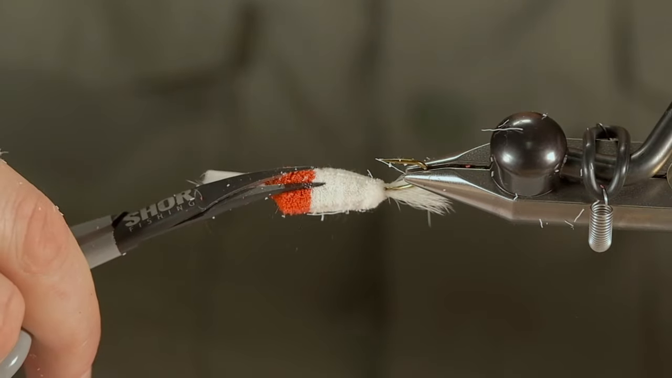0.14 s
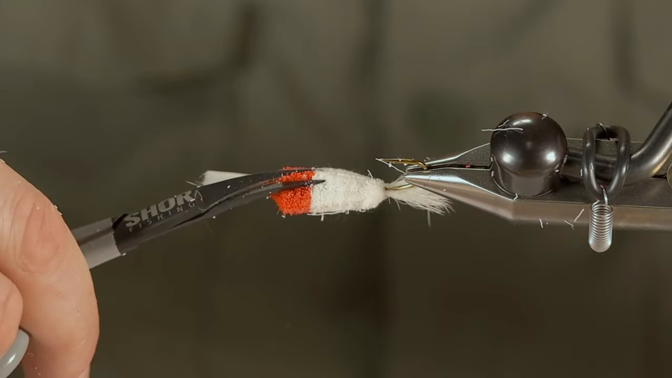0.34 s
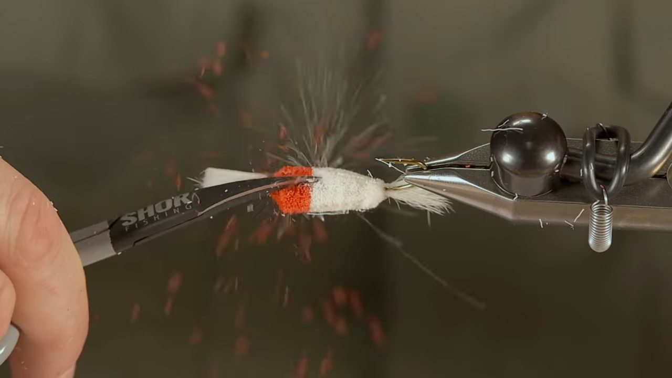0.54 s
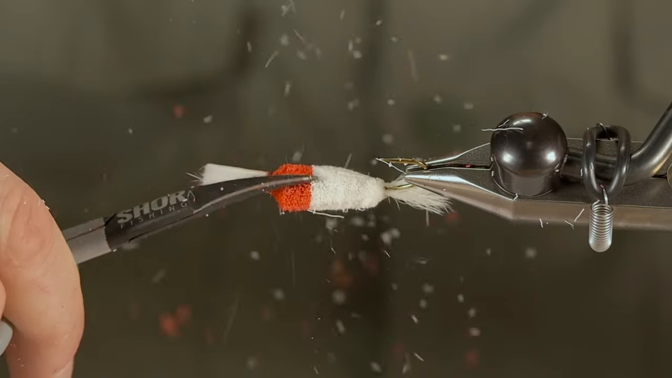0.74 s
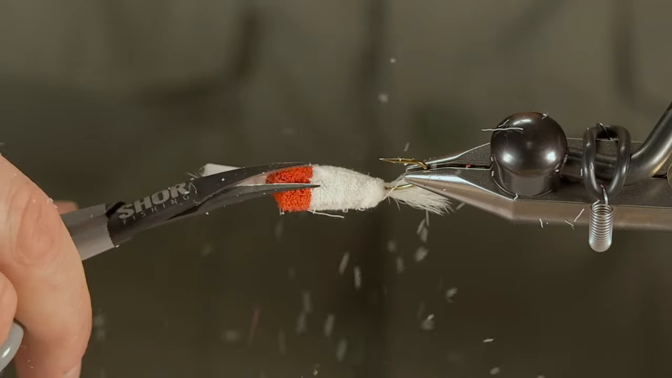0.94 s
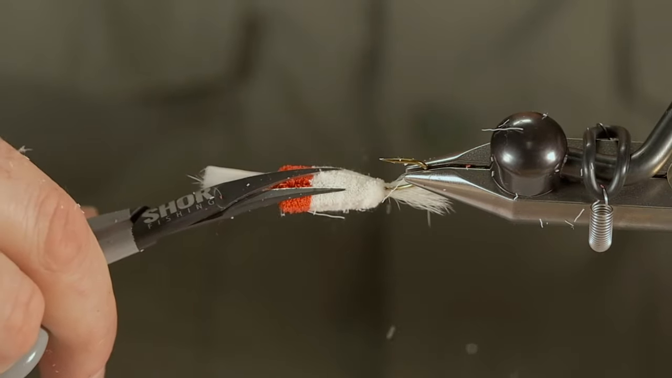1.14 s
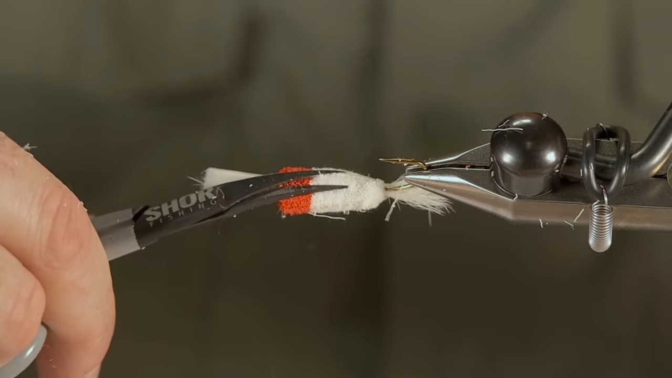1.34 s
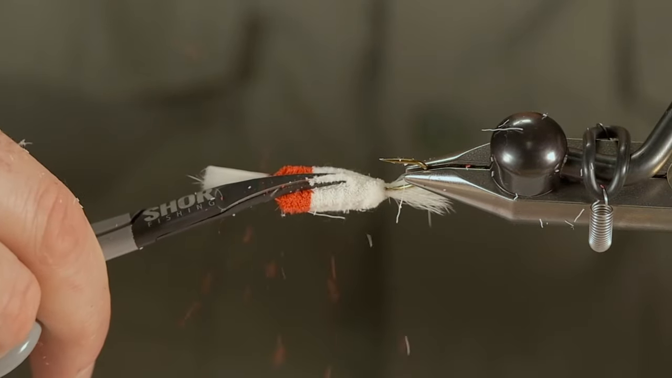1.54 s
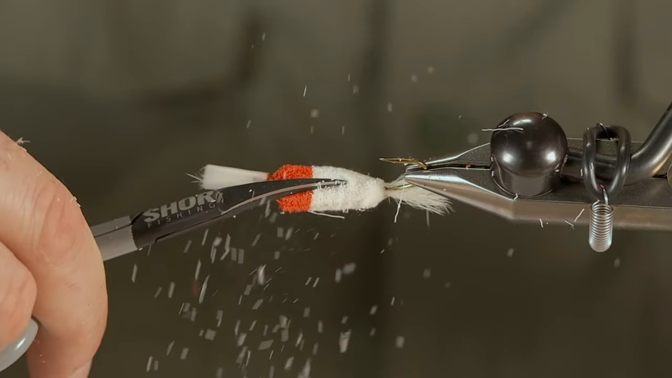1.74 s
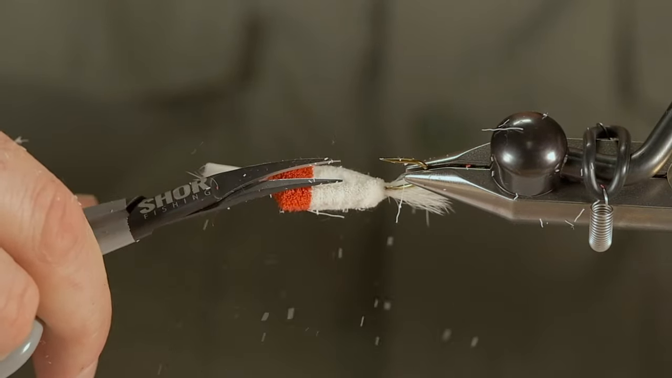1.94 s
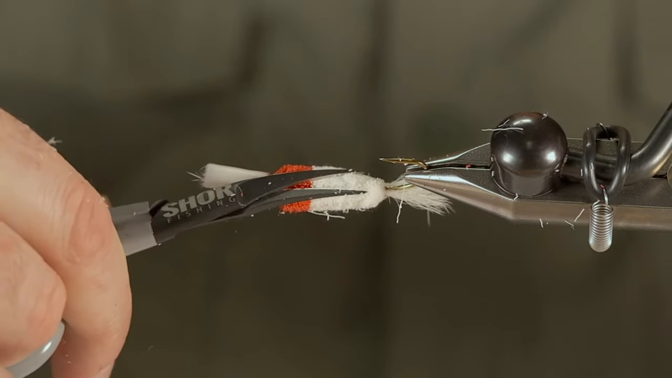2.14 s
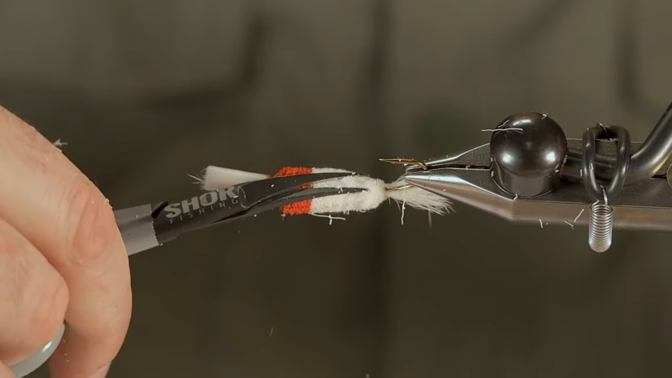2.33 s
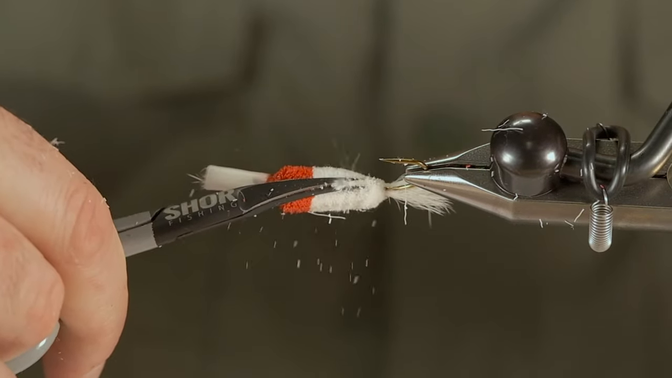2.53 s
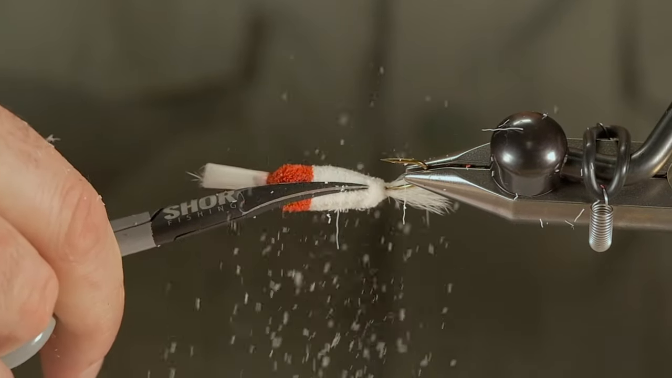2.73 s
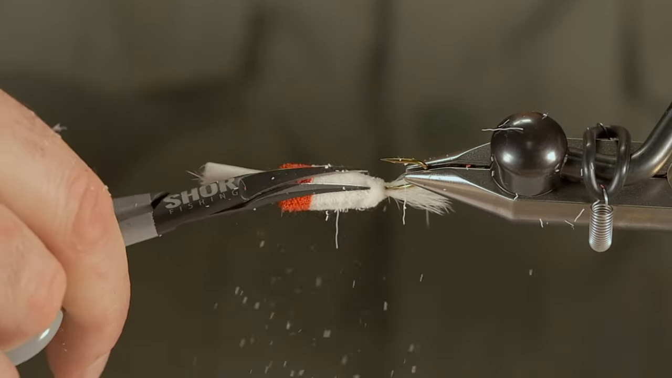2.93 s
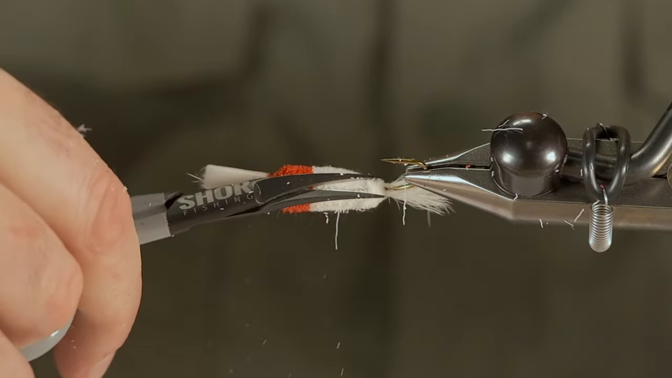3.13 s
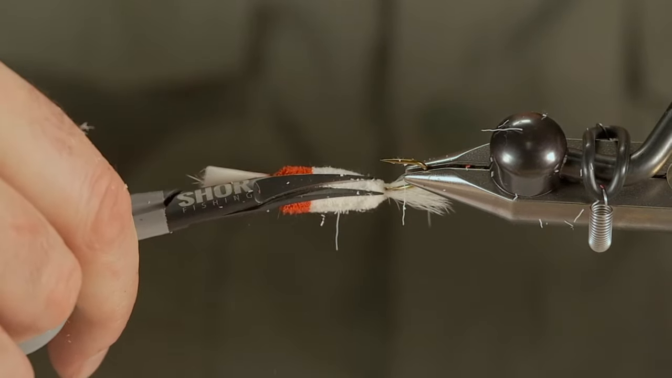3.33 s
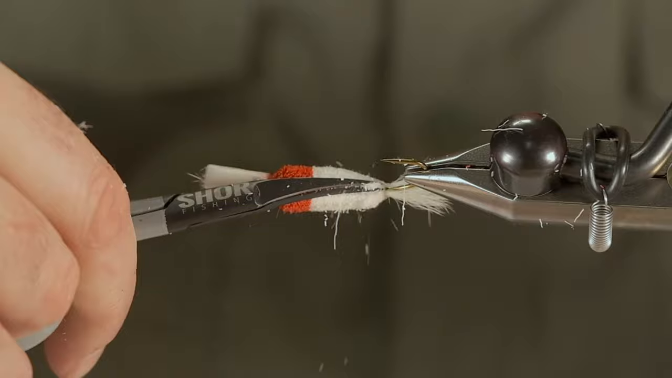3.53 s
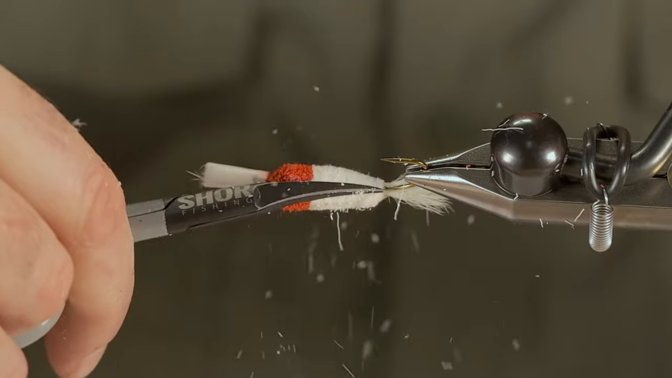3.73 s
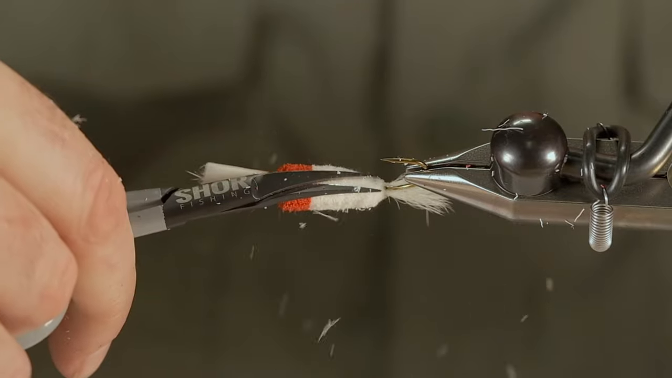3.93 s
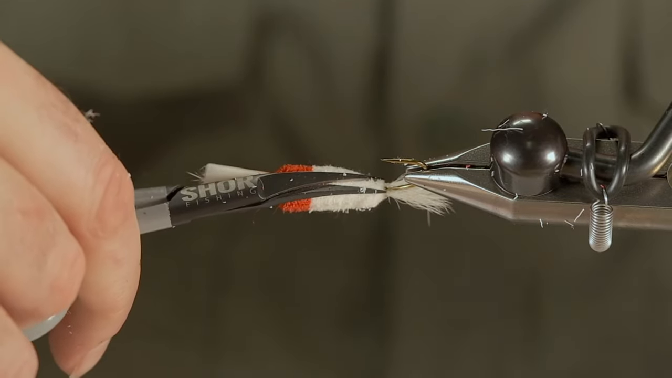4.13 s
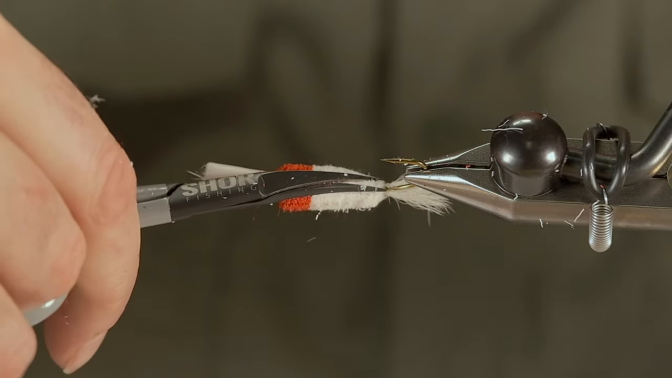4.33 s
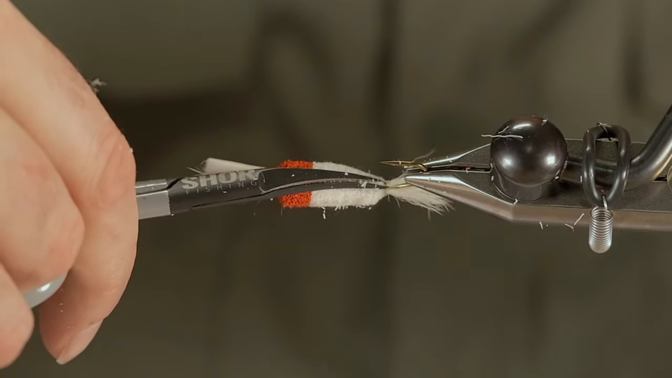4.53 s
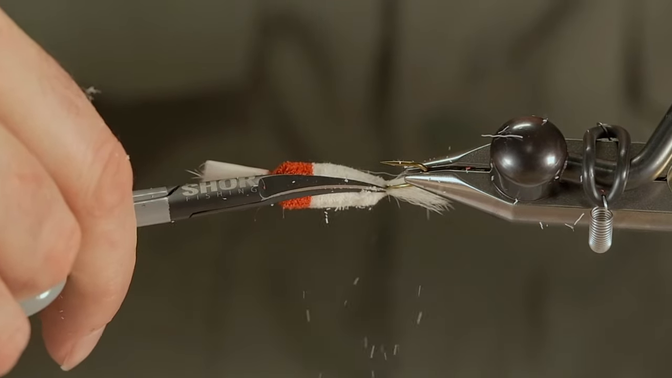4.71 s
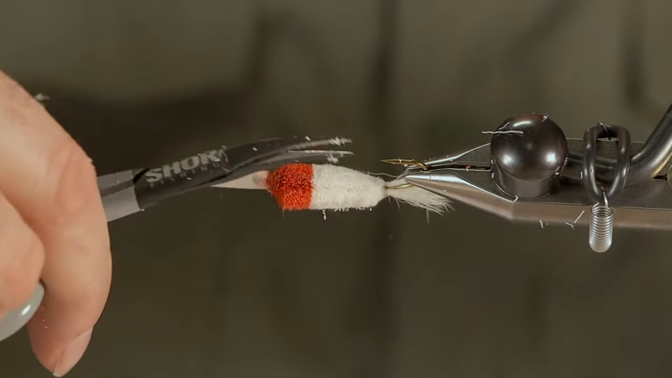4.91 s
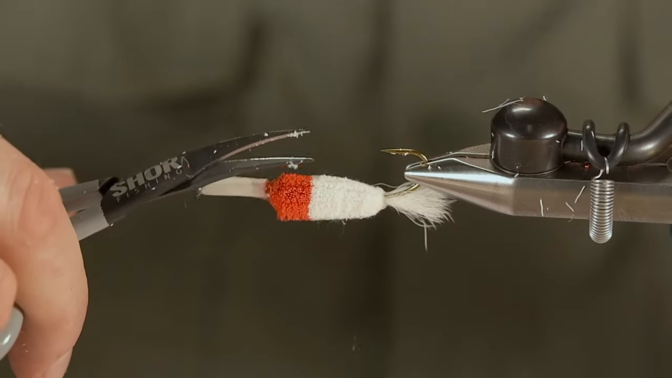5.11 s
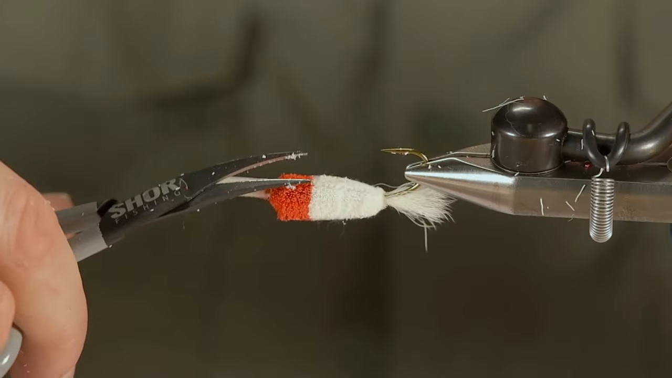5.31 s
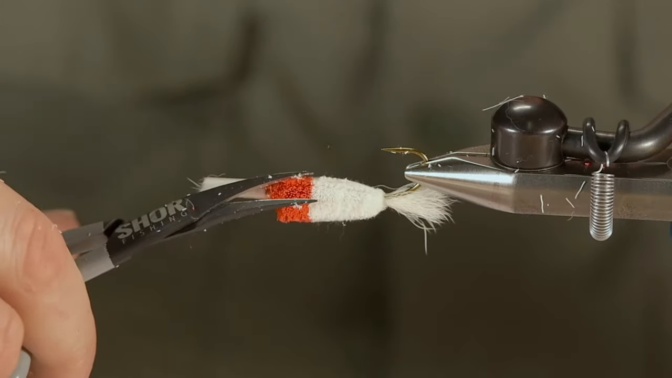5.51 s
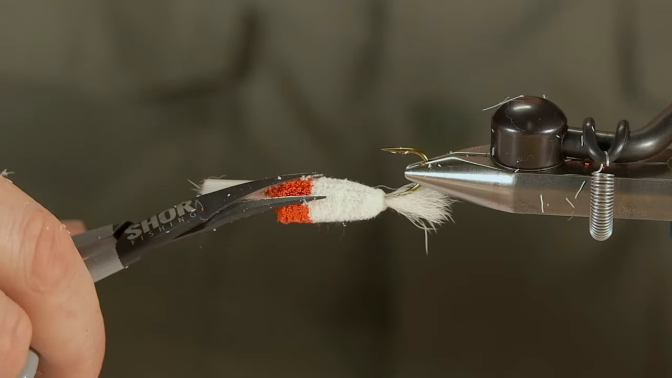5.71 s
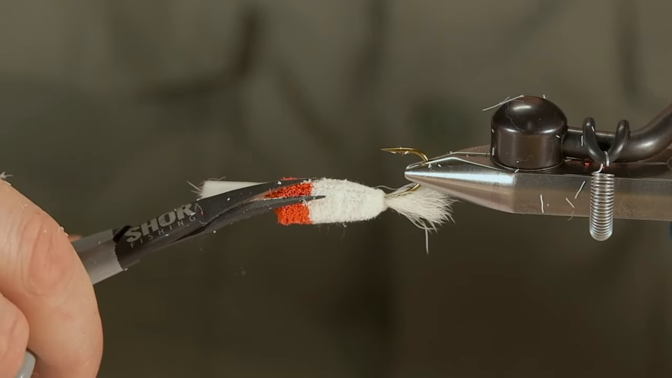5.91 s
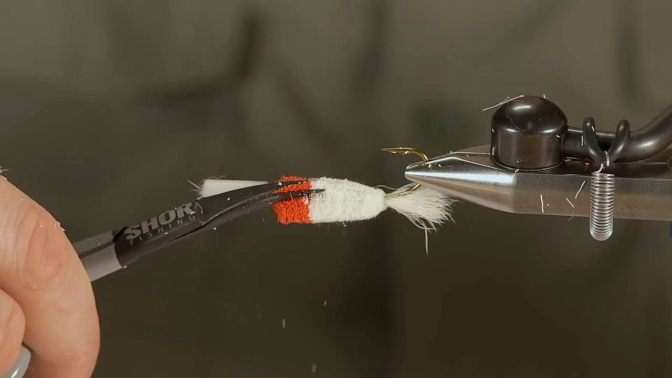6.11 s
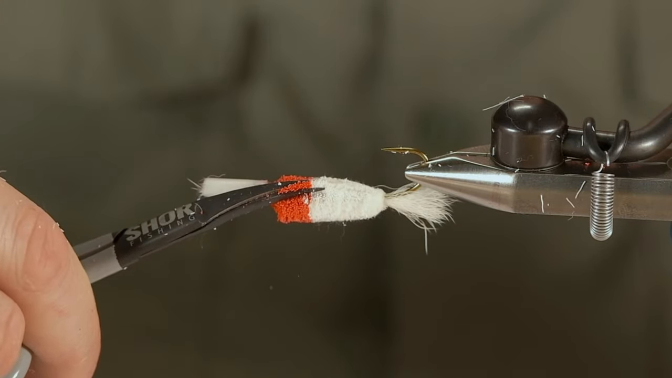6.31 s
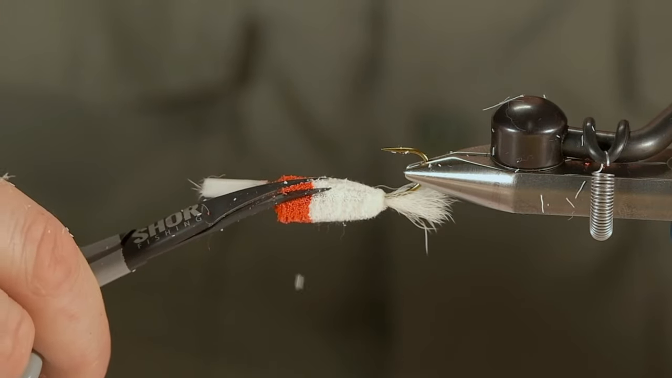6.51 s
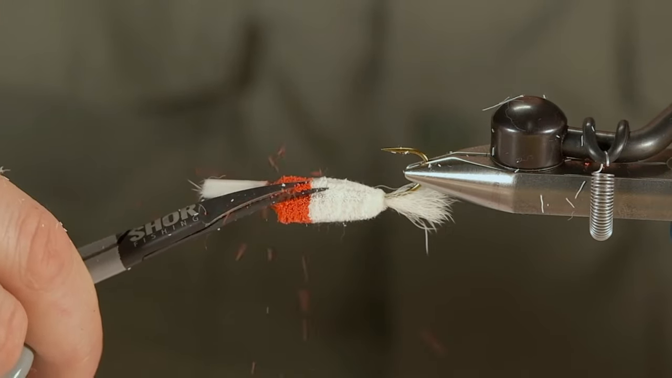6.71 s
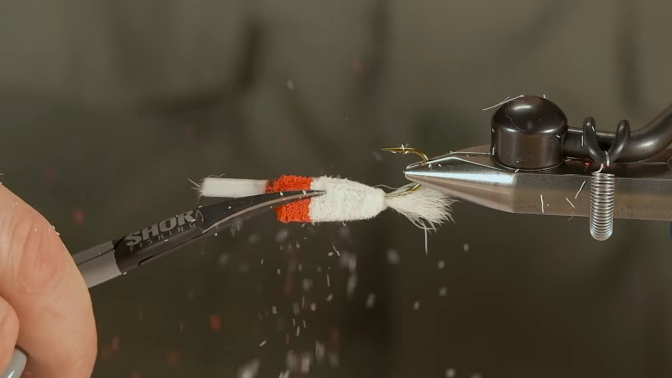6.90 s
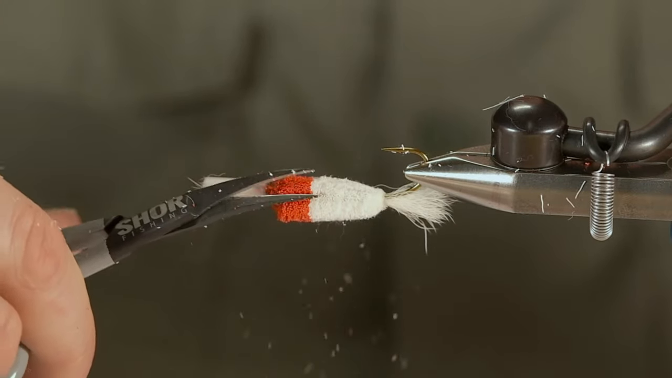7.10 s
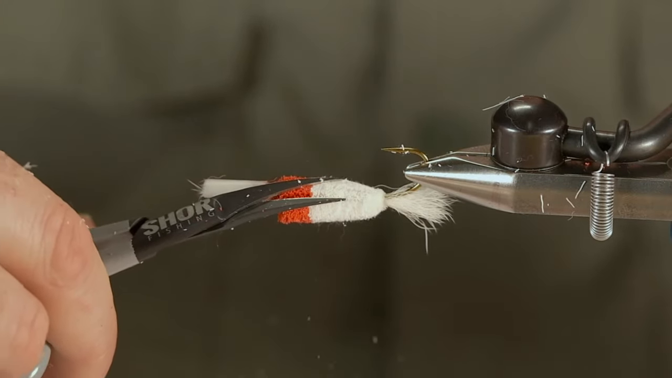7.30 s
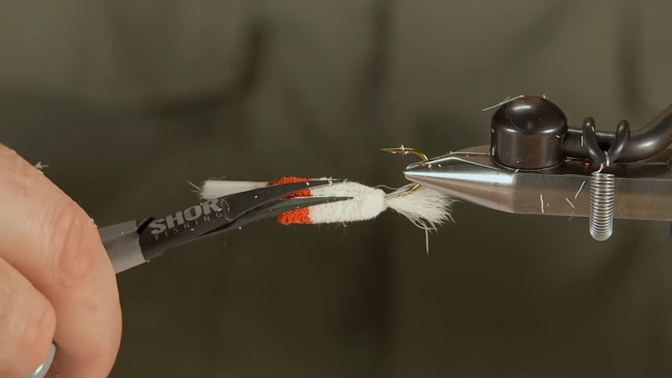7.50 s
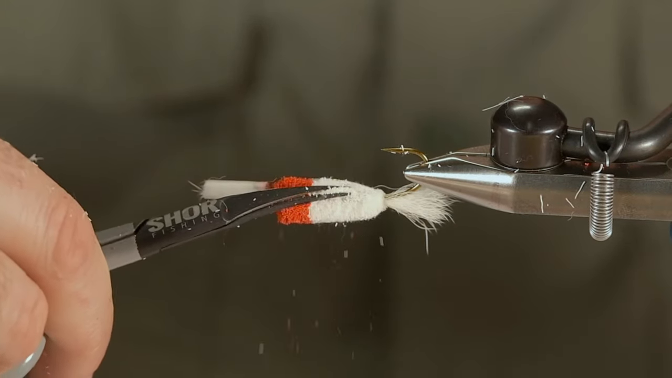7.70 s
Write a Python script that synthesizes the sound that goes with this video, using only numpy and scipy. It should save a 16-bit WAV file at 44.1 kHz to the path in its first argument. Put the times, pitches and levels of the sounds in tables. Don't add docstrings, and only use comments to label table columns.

```python
import sys
import numpy as np
from scipy import signal
from scipy.fft import rfft, irfft
from scipy.io import wavfile
from scipy.ndimage import uniform_filter1d

SR = 44100
rng = np.random.default_rng(int(sys.argv[2]) if len(sys.argv) > 2 else 0)


def unload_audio(sound):
    columns = np.transpose(np.atleast_2d(sound))
    steps = np.round(np.clip(columns, -1, 1) * 32767)
    wavfile.write(sys.argv[1], SR, steps.astype(np.int16))


def ratio_of_db(decibels):
    return 10 ** (np.asarray(decibels, float) / 20)


N = 341775

# (frequency [Hz], level [dB per Hz])
AIR_HISS = [(15, -65), (25, -31), (70, -9), (113, -8), (161, 0.5), (199, -7), (324, -7), (447, -16.5),
            (570, -16.5), (618, -8.5), (854, -17), (1970, -19), (2440, -19.5), (3120, -21.5),
            (15700, -30.5)]
# (frequency [Hz], level [dB])
HISS_TOP = [(15750, 0), (15950, -30)]
# (frequency [Hz], width [Hz], rms level [dB])
DUCTS = [(171, 21.5, -68.5), (310.4, 42, -72), (490, 38, -71), (640, 76, -75.5), (696.5, 21, -70.5),
         (776, 21.7, -93), (1179, 45, -73.5), (1359, 15, -75), (2126, 47, -74), (2428, 45, -70.5),
         (2650, 63, -73.5), (4190, 77, -79)]
# (frequency [Hz], rms level [dB])
FAN_TONES = [(628, -64.5), (790, -76), (2445, -74.5)]

# (time [s], length [s], desk shake [dB], bearing rub [dB])
TWISTS = [
    (5.034, .16, -53.5, -52),
    (5.21, 0.091, -60, -63),
    (5.334, 0.21, -55.5, -62),
    (5.512, 0.086, -64, -69),
]
# (time [s], length [s], level [dB])
SLEEVE = [
    (4.91, .04, -60),
    (5.04, 0.11, -58.5),
    (5.26, 0.16, -65),
    (5.76, 0.29, -62),
]
GRIP_S, LET_GO_S, RUB_T60_S = 0.04, 0.31, 0.82
# (frequency [Hz], width [Hz], level [dB])
RUMBLE = [(50, 25, -14), (98, 28, 3), (133, 23, -4), (216, 22, 7), (331, 30, 0.5)]
# (time [s], peak [dB], centre [Hz], t60 [s])
TICKS = [(.833, -51, 6400, 0.011), (2.8544, -53, 5000, .008), (5.0589, -53, 3700, .01),
         (5.084, -46, 5900, .006), (5.098, -42.5, 8500, .008), (5.154, -49, 4800, 0.055),
         (5.3414, -47, 4900, 0.0086), (5.345, -51, 9000, .006), (5.365, -39, 3850, 0.014),
         (5.3718, -40, 3500, .012), (5.372, -40, 4900, .012), (5.446, -49, 3600, .012),
         (5.576, -49, 7500, .006), (5.817, -53, 5500, 0.0054), (5.8356, -49, 4000, .008),
         (5.8743, -47, 7450, .008), (5.9414, -53, 9060, 0.0053), (5.97, -49, 7160, .01),
         (7.504, -49.5, 3300, .015)]
# (time [s], peak [dB], frequency [Hz], t60 [s])
VISE_RINGS = [(5.05, -53, 745, .2), (5.093, -56, 3500, .14), (5.157, -57, 3490, .15),
              (5.155, -55, 1150, .07), (5.21, -53, 750, .25), (5.205, -70, 5560, .5),
              (5.295, -68, 5680, .3), (5.365, -44, 1270, .035), (5.3713, -45, 1270, .035),
              (5.367, -48, 420, .04), (5.371, -52, 850, .03), (5.371, -49, 2200, .015),
              (5.446, -53, 1290, .025), (5.372, -48, 3450, .025), (5.515, -59, 2700, .06),
              (5.527, -54, 1150, .09), (5.446, -55, 3400, .025)]

# (time [s], knock [dB], sway [dB], handles [dB])
BUMPS = [
    (0.606, -45, -49, -42.5),
    (1.659, -38, -43.5, -39),
    (2.607, -42, -42.5, -38),
    (3.618, -35, -38.5, -39.5),
    (4.452, -41, -55.5, -69),
    (4.629, -38.5, -40, -39),
    (5.218, -42, -47.5, -54),
    (5.415, -44, -53, -57),
    (5.527, -48, -54, -60),
    (6.822, -42, -45.5, -41),
]
# (frequency [Hz], level [dB], t60 [s])
DESK_KNOCK = [(216.5, 4.5, 0.11), (249.5, -6.5, 0.24), (301.5, -0.5, 0.12), (392, -15.5, 0.22)]
# (frequency [Hz], level [dB], t60 [s])
DESK_SWAY = [(51.5, -13, 1), (75.5, -5.5, 0.64), (84, -5.5, 0.51), (98.5, -0.5, 0.63), (106, -19, 0.56),
             (125.4, -11, 1)]

SHUT_TIMES = [.6062, 1.6589, 2.6055, 3.6172, 4.629, 6.8223]
# (length [s], cutting at its end [dB], last tuft [dB])
STROKES = [(0.099, -57, -44), (.09, -64, -50), (0.11, -62, -52), (0.065, -63, -63), (0.064, -72, -58),
           (0.097, -57.5, -46)]
CUT_DB_PER_S, TUFT_DB_PER_S, TUFT_LEAD_S = 122, 2400, 0.003
# (time [s], peak [dB])
STRANDS = [(.5094, -56), (.543, -53), (.558, -52), (.573, -46), (0.585, -49), (.5955, -47), (.601, -50),
           (2.5975, -50), (3.5654, -56), (3.585, -55), (3.6085, -50), (6.7445, -53), (6.7594, -54),
           (6.776, -50), (6.789, -47), (6.807, -50), (6.8145, -42), (1.6578, -36), (2.6035, -46),
           (3.6152, -42), (4.6262, -44), (4.6277, -38)]

# (shank [dB], blade [dB], tip [dB], edge [dB])
SNIP_COLOURS = [(-4.5, -6.5, -2.5, -2.5), (-3, -7.5, -4.5, -4), (-7.5, -3.5, -5.5, -6),
                (-7.5, -7.5, -3.5, -8), (-13, -12, -8, -9), (-6.5, -5, -6, -4.5)]
# (frequency [Hz], level [dB], t60 [s])
BLADE_MODES = [(1835, -8.5, 0.044), (2276, -0.5, 0.058), (2640, -16.5, 0.023), (3360, -15, 0.021),
               (3765, -5.5, 0.032), (4350, -6, 0.034), (4710, -6.5, 0.029), (5220, -9.5, 0.047),
               (5930, -8, 0.03), (6720, -8, 0.016), (7420, -5, 0.0233), (8030, -2.5, 0.024),
               (9420, -5, .022), (11180, -5, 0.013)]
# (frequency [Hz], level [dB per Hz])
LAST_CRACK = [(300, -44), (1450, -14), (2400, -3), (3000, -6), (7500, -3), (12200, -14.5), (15300, -15),
              (16400, -44)]
# (delay [s], level [dB])
WALLS = [(.0065, -13), (.0114, -14.5), (.0172, -29), (.0226, -44), (.031, -44)]
# (frequency [Hz], level [dB per Hz])
ECHOES = [(530, -62), (900, -34), (1070, -8.5), (1560, -8), (2300, -9), (3000, -11), (3600, -0.5),
          (4710, -5.5), (5320, -4), (7950, -3), (8980, -12), (11700, -3), (15000, -11), (15900, -20),
          (16500, -35)]
# (frequency [Hz], width [Hz], level [dB])
LINGER = [(2277, 120, 1), (3790, 120, -5), (4580, 190, -3.5), (6400, 200, -3.5), (7270, 160, 2),
          (8100, 180, 1), (9750, 200, -0.5), (11460, 260, -7)]
# (frequency [Hz], level [dB])
ROOM_TOP = [(15800, 0), (16100, -25)]
ROOM_T60_S, ROOM_DB, ROOM_FOLLOW = 0.14, -31.5, 0.45

# (frequency [Hz], left minus right [dB])
PORTS = [(700, 1.55), (1200, 1.1), (2500, 1.25), (5000, 1.35), (9000, 1.45), (13000, 1.3)]
# (frequency [Hz], level [dB])
TREBLE_END = [(16500, 0), (16800, -60)]


def fade(t, t60):
    return (t >= 0) * np.exp(-np.log(1000) * np.maximum(t, 0) / t60)


def unit(x):
    return x / np.sqrt(np.mean(x ** 2))


def noise(size=N):
    return rng.standard_normal(size)


def band(x, hz, width):
    return signal.lfilter(*signal.iirpeak(hz, hz / width, fs=SR), x)


def above(x, hz):
    return signal.sosfilt(signal.butter(3, hz, "high", fs=SR, output="sos"), x)


def colour(x, points):
    hz, db = np.transpose(points)
    grid = np.maximum(np.fft.rfftfreq(len(x), 1 / SR), 1)
    gain = ratio_of_db(np.interp(np.log(grid), np.log(hz), db))
    return irfft(rfft(x) * gain, len(x))


def walk(rate, size=N):
    span = int(SR / rate)
    return unit(uniform_filter1d(uniform_filter1d(noise(size), span), span))


def ring(modes, t, phases):
    return sum(ratio_of_db(db) * fade(t, t60) * np.sin(2 * np.pi * hz * t + phase)
               for (hz, db, t60), phase in zip(modes, phases))


def add(out, s, x):
    i = int(s * SR)
    out[i:i + len(x)] += x[:N - i]


def room():
    air = colour(unit(colour(noise(), AIR_HISS)) * ratio_of_db(-57.5), HISS_TOP)
    ducts = sum(ratio_of_db(db) * unit(band(noise(), hz, width)) for hz, width, db in DUCTS)
    turns = np.cumsum(1 + 0.002027 * walk(2.917)) / SR
    tones = sum(ratio_of_db(db + 3 + 1.8 * walk(6)) * np.sin(2 * np.pi * hz * turns) for hz, db in FAN_TONES)
    return air + ducts + tones


def moves(rows):
    t = np.arange(N) / SR
    return sum(ratio_of_db(db) * np.clip((t - s) / GRIP_S, 0, 1) * fade(np.maximum(t - s - hold, 0), LET_GO_S)
               for s, hold, db in rows)


def vise():
    shake = unit(sum(ratio_of_db(db) * unit(band(noise(), hz, width)) for hz, width, db in RUMBLE))
    out = shake * moves([(s, length, db) for s, length, db, _ in TWISTS])
    time = np.arange(N) / SR
    rub = sum(ratio_of_db(db) * moves([(s, 0, 0)]) ** .5 * fade(time - s, RUB_T60_S) for s, *_, db in TWISTS)
    out += unit(band(noise(), 706, 54)) * rub
    rustle = unit(band(noise() * ratio_of_db(2.9 * walk(200)), 3400, 5300))
    out += rustle * moves(SLEEVE) * ratio_of_db(-7.5)
    t = np.arange(SR // 8) / SR
    for s, db, hz, t60 in TICKS:
        burst = noise(len(t)) * fade(t, t60)
        tick = band(band(burst, hz, 0.51 * hz), hz, 0.58 * hz)
        add(out, s, tick * ratio_of_db(db) / np.abs(tick).max())
    for s, db, hz, t60 in VISE_RINGS:
        add(out, s, ring([(hz, db, t60)], t, [0]) * ratio_of_db(1.4 * walk(280, size=len(t))))
    return out


def thud(knock_db, sway_db, handle_db):
    t = np.arange(SR // 2) / SR
    handles = ring([(400, 1, .02), (520, 1, .015), (1050, 1, .012), (1250, 2, .012)], t, np.zeros(4))
    knock = ring(DESK_KNOCK, t, np.zeros(4)) * (1 - fade(t, 0.06))
    late = t - .018
    phases = [-2 * np.pi * hz * 0.0182 for hz, *_ in DESK_SWAY]
    sway = ring(DESK_SWAY, late, phases) * (1 - fade(late, 0.077))
    return above(ratio_of_db(knock_db) * knock + ratio_of_db(sway_db) * sway + ratio_of_db(handle_db) * handles, 46)


def closing():
    t, out = np.arange(N) / SR, 0
    for shut, (length, cut_db, tuft_db) in zip(SHUT_TIMES, STROKES):
        left = np.clip(shut - TUFT_LEAD_S - t, 0, 1)
        cutting = ratio_of_db(cut_db - CUT_DB_PER_S * left)
        pinch = ratio_of_db(tuft_db - TUFT_DB_PER_S * left)
        out = out + (t < shut) * (left < length) * (cutting + pinch)
    return out


def hairs():
    sizes = ratio_of_db(np.minimum(2.5 * rng.exponential(size=N), 9))
    clicks = sizes * (rng.random(N) < 2500 / SR) * noise()
    out = (unit(clicks) + ratio_of_db(-11) * noise()) * closing()
    for s, db in STRANDS:
        add(out, s, ratio_of_db(db) * noise(132) * fade(np.arange(132) / SR, .004))
    return band(band(out, 4600, 8600), 4600, 8600) * ratio_of_db(4)


def blades(t, tilt):
    chance = rng.standard_normal((2, len(BLADE_MODES)))
    modes = [(hz * (1 + .003 * a), db + 2.5 * b, t60) for (hz, db, t60), a, b in zip(BLADE_MODES, *chance)]
    steel = ring(modes, t, rng.uniform(0, 2 * np.pi, len(modes)))
    crack = unit(colour(noise(len(t)), LAST_CRACK)) * fade(t, 0.0085) * ratio_of_db(8)
    contact = (1 - fade(t, .0014)) ** 2
    clamp = ratio_of_db(-14) + (1 - ratio_of_db(-14)) / (1 + np.exp(np.minimum((t - .0044) / .0002, 50)))
    snap = above(colour((steel + crack) * contact * clamp, tilt), 1120) * ratio_of_db(-13)
    return snap - .7 * band(snap, 1600, 300)


def room_answer(t, tilt, snap):
    wall = sum(ratio_of_db(db + 1.8 * rng.standard_normal()) * np.roll(snap * fade(t, 0.019), int(s * SR))
               for s, db in WALLS)
    diffuse = unit(colour(colour(noise(len(t)), ECHOES), tilt / [1, 2]))
    rings = sum(ratio_of_db(db + 2 * rng.standard_normal()) * unit(band(noise(len(t)), hz, width))
                for hz, width, db in LINGER)
    tail = diffuse * fade(t, ROOM_T60_S) + ratio_of_db(-7.5) * rings * fade(t, 0.14)
    level = ratio_of_db(ROOM_DB + ROOM_FOLLOW * np.mean(tilt[:, 1]) + 1.4 * walk(470, size=len(t)))
    build_up = (1 - fade(t - .003, 0.0038)) * (t > .003)
    return colour(wall + tail * level * build_up, ROOM_TOP)


def snip(shank_db, blade_db, tip_db, edge_db):
    t = np.arange(SR // 4) / SR
    tilt = np.array([(2500, shank_db), (3500, blade_db), (5500, blade_db), (7500, tip_db), (11000, edge_db)])
    snap = blades(t, tilt)
    return (snap + room_answer(t, tilt, snap)) * np.clip((.22 - t) / .05, 0, 1)


def scene():
    mid = room() + vise() + hairs()
    for s, *levels_db in BUMPS:
        add(mid, s, thud(*levels_db))
    for s, levels_db in zip(SHUT_TIMES, SNIP_COLOURS):
        add(mid, s, snip(*levels_db))
    ports = [colour(mid, [(hz, side * db / 2) for hz, db in PORTS]) for side in (1, -1)]
    hiss = [colour(above(noise(), 13000), HISS_TOP) for _ in ports]
    cavity = ratio_of_db(-24) * above(np.roll(mid, 5), 10800) * np.array([[1], [-1]])
    return np.array(ports) + cavity + ratio_of_db(-79) * np.array(hiss)


def band_limit(x):
    return signal.sosfilt(signal.butter(12, 16790, fs=SR, output="sos"), x)


def record(dry):
    keep = np.exp(-1 / (.09 * SR))
    loud = signal.lfilter([1 - keep], [1, -keep], np.mean(dry ** 2, axis=0))
    gain = (1 + loud / ratio_of_db(-40) ** 2) ** -.2
    mix = np.array([colour(port, TREBLE_END) for port in dry * gain])
    return band_limit(mix)


dry = scene()
out = record(dry)
unload_audio(out)
```